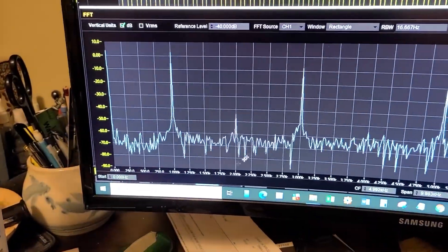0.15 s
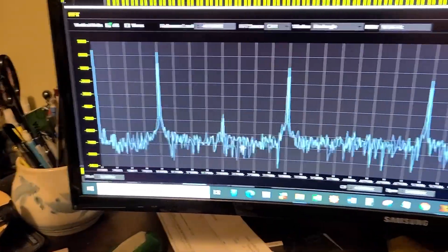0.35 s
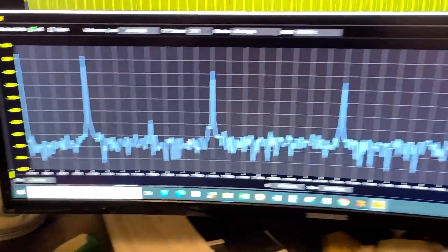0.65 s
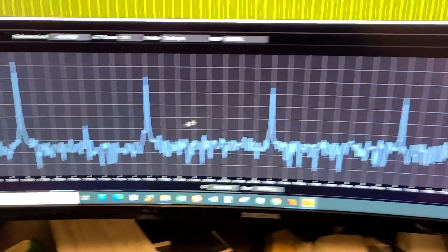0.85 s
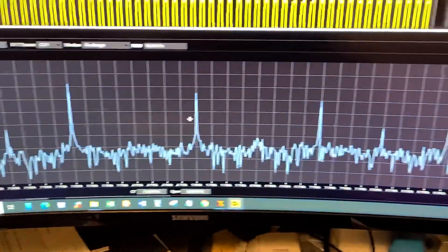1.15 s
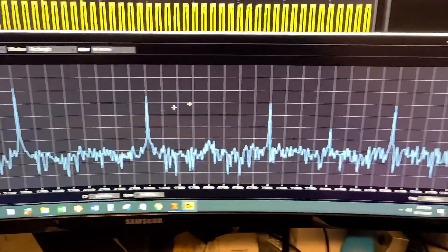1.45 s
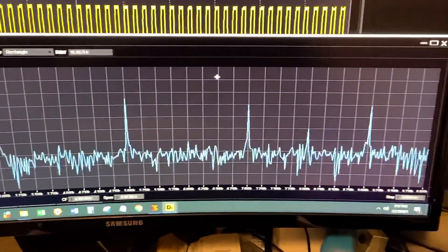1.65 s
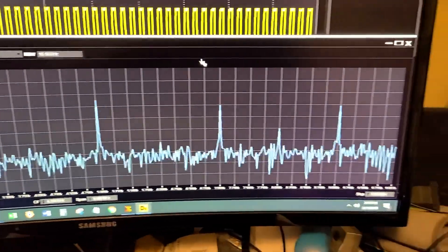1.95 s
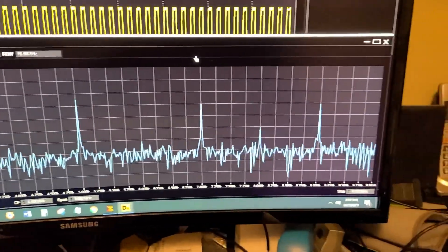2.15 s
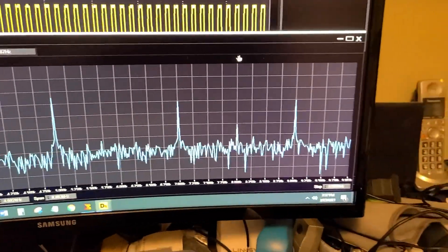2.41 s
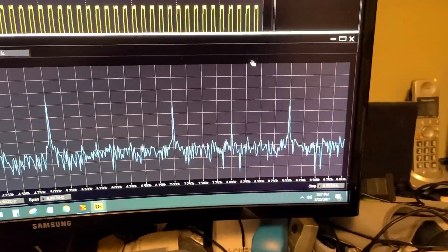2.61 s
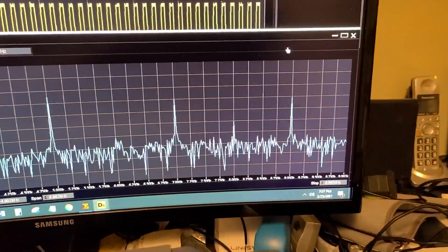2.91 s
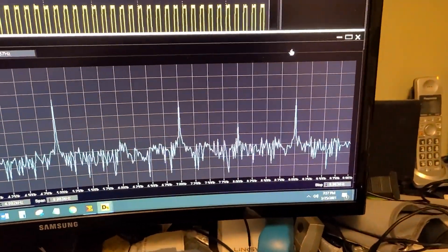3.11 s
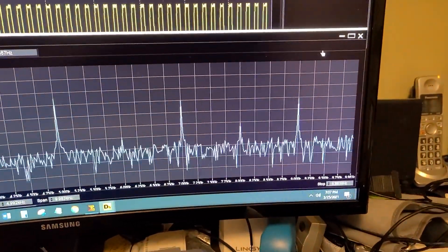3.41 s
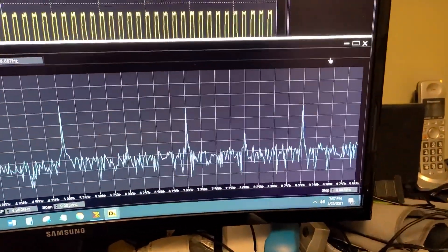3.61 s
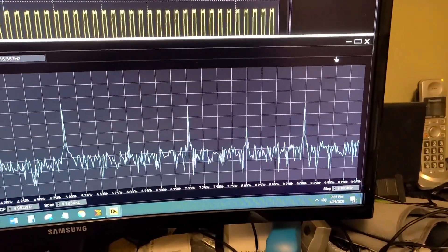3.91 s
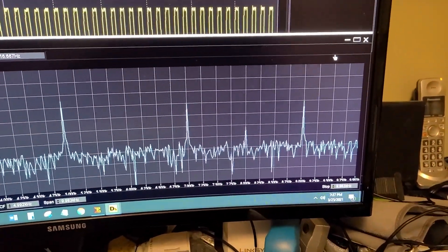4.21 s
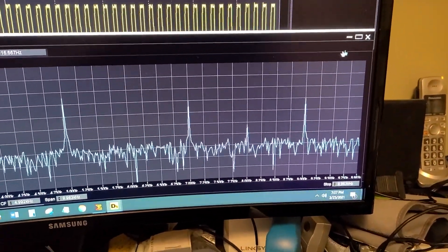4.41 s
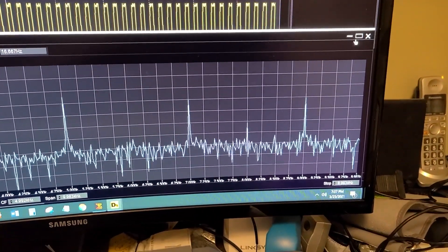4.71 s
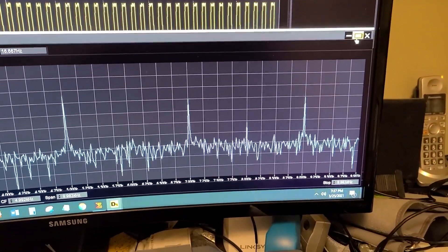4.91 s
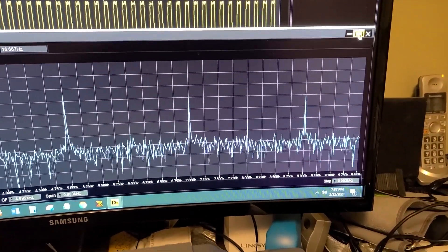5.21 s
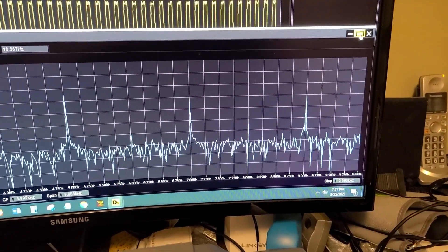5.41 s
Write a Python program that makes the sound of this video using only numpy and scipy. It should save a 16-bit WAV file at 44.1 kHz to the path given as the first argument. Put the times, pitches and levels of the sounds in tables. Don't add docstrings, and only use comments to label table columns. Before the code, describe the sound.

Close phone pickup in a small room: a low, slightly wavering fan tone with soft air rush and hiss underneath. Two faint desk bumps come first, then firmer hollow knocks of a plastic mouse with a tiny loose rattle and a short rubbing slide. A clattering landing and a softer one follow; near the end the button snaps down and up.

```python
import sys
import numpy as np
from scipy import signal
from scipy.fft import rfft, irfft
from scipy.io import wavfile
from scipy.ndimage import uniform_filter1d

SR = 44100
rng = np.random.default_rng(int(sys.argv[2]) if len(sys.argv) > 2 else 0)


def natural_amplitude(level_db):
    exponent = np.asarray(level_db, float) / 20
    return 10 ** exponent


def unload_audio(sound):
    columns = np.transpose(np.atleast_2d(sound))
    steps = np.round(np.clip(columns, -1, 1) * 32767)
    wavfile.write(sys.argv[1], SR, steps.astype(np.int16))


N = 244755
T = np.arange(N) / SR


def read(table, hz):
    f, v = np.transpose(table)
    return np.interp(np.log(hz + 1e-9), np.log(f), v)


def noise(colour, size=N):
    # [f/Hz, likeness 0-1]
    likeness = [(20, 0.7), (60, 0.88), (110, 0.92), (270, 0.94), (430, 0.95), (600, 0.39), (1000, 0),
                (20000, 0)]
    hz = np.fft.rfftfreq(size, 1 / SR)
    like = np.clip(read(likeness, hz), 0, 1)
    mid, side = rfft(rng.standard_normal((2, size))) * natural_amplitude(read(colour, hz))
    mid = mid * np.sqrt(1 + like)
    side = side * np.sqrt(1 - like)
    out = irfft(np.array([mid + side, mid - side]), size)
    return out / np.sqrt(np.mean(out ** 2))


def walk(rate_hz):
    hold = int(SR / rate_hz)
    steps = np.repeat(rng.standard_normal(N // hold + 1), hold)
    v = uniform_filter1d(uniform_filter1d(steps, hold), hold)[:N]
    return v / v.std()


def ring(modes, db, scatter_db, lag_ms=0., unlike=0., rise_ms=.1):
    hz, gain_db, t60_s = np.transpose(modes)[:, :, None]
    pitch_scatter = 0.008
    chance = rng.standard_normal((4, len(modes), 1))
    t = np.arange(SR // 4) / SR
    sense = (-1) ** np.arange(len(modes))[:, None]
    gain = natural_amplitude(gain_db + scatter_db * chance[0]) * sense
    out = []
    for port, lag_s in ((1.0, lag_ms / 1000), (-1.17, 0.000054)):
        late = np.maximum(t - lag_s, 0)
        phase = 2 * np.pi * hz * (1 + pitch_scatter * chance[1]) * late + port * unlike * chance[2]
        rise = (1 - np.exp(-late * 1000 / rise_ms)) ** 2
        decay = np.exp(-np.log(1000) * late / t60_s)
        port_gain = natural_amplitude(port * unlike * 2 * chance[3])
        out.append(np.sum(gain * port_gain * rise * decay * np.sin(phase), axis=0))
    return natural_amplitude(db) * np.array(out) / np.abs(out).max()


def crack(colour, db, t60_s, rise_ms=0.9):
    t = np.arange(SR // 8) / SR
    rise = 1 - np.exp(-t * 1000 / rise_ms)
    burst = noise(colour, size=len(t)) * rise * natural_amplitude(-60 * t / t60_s)
    return natural_amplitude(db) * burst / np.sqrt(np.mean(burst[:, :SR // 200] ** 2))


def add(out, sound, s):
    i = int(s * SR)
    out[:, i:i + sound.shape[1]] += sound[:, :N - i]


def knocks():
    # [t/s, desk force/dB, shell/dB re force, edge/dB re force, hardness/dB re edge]
    landings = [(.332, -48, -23, -40, -2), (0.4838, -47, -1, -16, -5), (1.1066, -42, 1.5, -0.5, -5),
                (1.115, -46.5, -7, -11.5, 8), (1.2330, -31, 2.5, -1, -10.5), (1.2414, -47, -30, 8, -15),
                (2.043, -40.5, 5, 3.5, -3), (2.052, -45, 3, -20, -3), (2.064, -37, 12, -3, -7),
                (2.072, -41, -3, -3, -6.5), (3.0388, -49.5, -4, -3, -17), (3.047, -50.5, -21, -3, -15),
                (3.0974, -35.5, 4.5, -5, -20), (3.1023, -48.5, 7, 4, -9)]
    # [t/s, peak level/dB]
    swings = [
        (1.109, -51),
        (1.233, -40.5),
        (2.064, -44.5),
        (3.101, -56.5),
    ]
    # [f/Hz, level/dB, t60/s]
    desk_modes = [(228.7, -11.5, 0.11), (331, -9, 0.055), (252, -22, 0.023)]
    thud_modes = [(112.7, 0, 0.27)]
    shell_modes = [(472.4, -6, 0.17), (534, 3.5, 0.065), (596, 13.5, 0.023), (726, -9.5, 0.14),
                   (791, 7.5, 0.034), (832, 8.5, 0.021), (967, -29, 0.014)]
    # [f/Hz, level/dB per Hz]
    edge_colour = [(350, -42), (700, 2.5), (1050, 6.5), (1350, 10), (1600, 6.5), (1900, -5), (2300, -13.5),
                   (3500, -36.5)]
    rim_colour = [(900, -48), (1500, -20), (1900, 5.5), (2300, 2), (2600, 4.5), (3100, -6.5), (3500, -46),
                  (5000, -51)]
    treble_colour = [(2000, -45), (3300, -3), (4200, -4.5), (5000, 0), (6000, -9), (7200, -3),
                     (8500, -23.5), (11000, -25), (14000, -31), (16000, -49)]
    lag_ms, edge_t60_s, treble_t60_s = 0.15, 0.041, 0.06
    rim_re_edge_db, treble_re_edge_db = -0.2, -9.5
    out = np.zeros((2, N))
    for s, desk_db, shell_re_db, edge_re_db, hard_db in landings:
        shell_db = desk_db + shell_re_db
        edge_db = desk_db + edge_re_db
        rim_db = edge_db + hard_db + rim_re_edge_db
        treble_db = edge_db + hard_db + treble_re_edge_db
        add(out, ring(desk_modes, desk_db + 4, 1.0, lag_ms, unlike=.05, rise_ms=3.8), s)
        add(out, -ring(shell_modes, shell_db + 3, 1.0, lag_ms, unlike=0.3, rise_ms=0.52), s)
        add(out, crack(edge_colour, edge_db, edge_t60_s), s)
        add(out, crack(rim_colour, rim_db, edge_t60_s) * natural_amplitude([[-1.5], [1.5]]), s)
        add(out, crack(treble_colour, treble_db, treble_t60_s), s)
    for s, db in swings:
        add(out, ring(thud_modes, db, 0., lag_ms, unlike=0., rise_ms=2.2), s)
    return out


def ticks():
    # [t/s, peak level/dB, f/Hz]
    rattles = [
        (1.1078, -43, 4600),
        (1.2346, -29, 4750),
        (2.0443, -35, 4600),
        (2.0443, -41, 2700),
        (3.044, -64, 4900),
        (5.0555, -54, 1950),
    ]
    out = np.zeros((2, N))
    for s, db, hz in rattles:
        modes = [(hz, 0, .0055), (1.11 * hz, -1, .005)]
        add(out, ring(modes, db, 0., 0., unlike=.2, rise_ms=.3), s)
    return out


def slide():
    # [f/Hz, level/dB per Hz]
    body_colour = [(300, -13), (600, -7.5), (900, -11), (1300, -2), (1500, -3), (1700, -3.5), (1900, -1.5),
                   (2400, -8), (3000, -9), (3700, -19.5), (4500, -23), (5800, -39)]
    treble_colour = [(2240, -23), (3800, -2.5), (5930, -5.5), (7280, -5), (8010, -12.5), (9600, -20),
                     (11600, -18), (15000, -23), (16000, -29)]
    start_s, attack_s, hold_s, fade_db_per_s = 1.333, 0.0082, 0.016, 233
    level_db, treble_db = -41.5, -13
    t = np.maximum(T - start_s, 0)
    catch = np.minimum(t / attack_s, 1)
    fade_db = -fade_db_per_s * np.maximum(t - attack_s - hold_s, 0)
    grain_db = 2 * walk(350)
    rub = noise(body_colour) + noise(treble_colour) * natural_amplitude(treble_db) * catch
    return rub * catch * natural_amplitude(level_db + fade_db + grain_db + [[.5], [-.5]])


def switch():
    # [t/s, peak level/dB, left minus right/dB, body/dB re peak, top/dB: a release is duller]
    snaps = [
        (5.0553, -54.5, 2.5, -5.5, -3),
        (5.2891, -32.5, 5.5, -11, 0),
        (5.4448, -32.5, 8, -12, -9),
    ]
    # [ms after the snap, level/dB, share of the lean left]
    bounces = [
        (0, 0, .3),
        (.62, 3, 1.3),
        (1.65, -8, 1.2),
    ]
    # [f/Hz, level/dB, t60/s]
    spring_modes = [(4880, -13, 0.0035), (5530, -6, 0.0045), (6550, -2, 0.0035), (7100, -.5, 0.004),
                    (8250, -13, .0035), (10800, -11, 0.0022), (14700, -11, 0.0025)]
    button_modes = [(655, 2, 0.016), (856, -3.5, 0.023), (1180, 0, 0.011), (1493, -4.5, 0.034),
                    (1940, -9.5, 0.025), (2610, -9, 0.014)]
    # [f/Hz, level/dB per Hz]
    tail_colour = [(1760, -47), (4300, -1), (5840, 6.5), (8170, -13), (9010, -12), (11500, 2), (13000, -22),
                   (14800, -8), (16000, -21)]
    top_from_hz = 7700
    tail_re_body_db, tail_t60_s = -5.5, 0.021

    def dulled(table, top_db):
        return [(hz, v + top_db * (hz > top_from_hz), *rest) for hz, v, *rest in table]

    out = np.zeros((2, N))
    for s, db, pan_db, body_re_db, top_db in snaps:
        lean_db = np.array([[pan_db / 2], [-pan_db / 2]])
        body_db = db + body_re_db
        for ms, bounce_db, share in bounces:
            snap = ring(dulled(spring_modes, top_db), db + bounce_db, .6, 0., unlike=.25, rise_ms=.15)
            add(out, snap * natural_amplitude(share * lean_db), s + ms / 1000)
        add(out, ring(button_modes, body_db, .8, 0., unlike=.4, rise_ms=.3), s)
        rustle = crack(dulled(tail_colour, top_db), body_db + tail_re_body_db, tail_t60_s)
        add(out, rustle * natural_amplitude(lean_db), s)
    return out


def room(x):
    # [f/Hz, t60/s, level/dB]
    bands = [(285, 0.22, -34), (954, 0.18, -27.5), (2660, 0.26, -25.5), (7000, 0.4, -29.5),
             (12000, 0.22, -23)]
    t = np.arange(SR // 3) / SR
    onset = np.minimum(t / 0.0022, 1)
    tail = 0
    for hz, t60_s, db in bands:
        band = noise([(hz / 4, -30), (hz / 1.16, 0), (hz * 1.58, 0), (hz * 4, -30)], size=len(t))
        unit_energy = np.sqrt(2 * np.log(1000) / t60_s / SR)
        tail = tail + band * natural_amplitude(db - 60 * t / t60_s) * unit_energy * onset
    return signal.fftconvolve(x.mean(axis=0, keepdims=True), 4 * tail, axes=1)[:, :N]


def ports(x, share):
    # [f/Hz, left minus right/dB]
    port_lean = [(600, 1), (1000, 4.5), (3000, 4), (4500, 5), (5600, 20), (6800, 75), (7800, 35),
                 (8800, 18), (11000, 1)]
    lean = natural_amplitude(share * read(port_lean, np.fft.rfftfreq(N, 1 / SR)))
    right = np.sqrt(2 / (1 + lean ** 2))
    return irfft(rfft(x) * np.array([right * lean, right]), N)


def fans():
    # [t/s, gain/dB]
    facing = [(0, 4), (.3, 4), (.63, 5), (.93, 1.5), (1.37, 4), (1.67, 0), (2.2, 0), (2.81, -1.5),
              (3.32, 0.25), (4.0, 0), (4.62, -.5), (5.55, 0.75)]
    # [t/s, left minus right/dB]
    direction = [(0, -3.5), (.8, 1), (1.75, 4.5), (2.6, 5.5), (5.55, 4)]
    shaft_orders = {9: (-72.5, 1.2), 11: (-75, -2.0), 12: (-81, .1), 16: (-71.5, -.5), 17: (-90.5, .1),
                    19: (-90.5, .1), 20: (-91, .1), 21: (-88, 3.7), 24: (-83.5, 10.6)}
    # [f/Hz, level/dB per Hz]
    rush_colour = [(82, -69), (140, -20), (260, -8.5), (320, -6), (350, -7), (395, 0.5), (430, 0.5),
                   (470, -5.5), (515, -10.5), (640, -18.5), (700, -23), (800, -17.5), (900, -29.5),
                   (1200, -87.5)]
    whir_colour = [(410, -36), (700, -14), (812, -9), (825, -18), (877, -10.5), (906, -8), (1220, -7.5),
                   (1320, -9), (1400, -7.5), (2600, -26.5), (3380, -59), (5720, -120)]
    rumble_colour = [(8.8, -57), (15, -45), (27, -31), (30, -9), (43, -13.5), (59, -3), (81, -5.5),
                     (103, 2), (123, -4), (140, -14), (180, -48), (310, -120)]
    shaft_hz, blades = 53.55, 7
    mains_hz, mains_db, rumble_db = 60.6, -85, -67.5

    facing_db = np.interp(T, *np.transpose(facing))
    tone_db = -58 + 1.5 * facing_db
    rush_db = -59 + 0.87 * facing_db
    whir_db = -73 + 0.96 * facing_db
    order_gain_db = -0.48 * facing_db

    pan_db = np.interp(T, *np.transpose(direction))
    lean_db = np.array([pan_db, -pan_db]) / 2
    heard_s = T + lean_db * 3.0e-5
    shaft_phase = 2 * np.pi * shaft_hz * heard_s + 0.044 * walk(10)
    blade_phase = blades * shaft_phase + 0.087 * walk(12)
    tones = np.sin(blade_phase) * natural_amplitude(tone_db + 1.7 * walk(12) + lean_db)
    for order, (db, side_db) in shaft_orders.items():
        side = np.array([[side_db / 2], [-side_db / 2]])
        order_tone = np.sin(order * shaft_phase + rng.uniform(0, 2 * np.pi))
        tones = tones + order_tone * natural_amplitude(db + order_gain_db + 0.92 * walk(7.1) + side)
    tones = tones + np.sin(2 * np.pi * mains_hz * T) * natural_amplitude(mains_db + 0.6 * walk(5.4))

    rush = np.array([np.interp(when, T, v) for when, v in zip(heard_s, noise(rush_colour))])
    rush = rush * natural_amplitude(rush_db + 1.3 * walk(8.5) + 0.26 * lean_db)
    whir = ports(noise(whir_colour), 0.89) * natural_amplitude(whir_db + 0.21 * walk(11.0))
    rumble = noise(rumble_colour) * natural_amplitude(rumble_db)
    return np.sqrt(2) * tones + rush + whir + rumble


def port_hiss():
    # [f/Hz, level/dB per Hz]
    hiss_colour = [(1060, -23), (1800, -2.5), (1960, -12.5), (2400, -6), (3050, -2.5), (4090, -11.5),
                   (5110, -14.5), (5710, -13.5), (6800, 3), (8030, -15.5), (8640, -26.5), (10600, -16),
                   (14900, -19.5), (15700, -18), (16300, -28)]
    return ports(noise(hiss_colour), 1) * natural_amplitude(-78.5 + 5.5)


def scene():
    mouse = knocks() + switch() + slide()
    tick = ticks()
    return ports(mouse + tick + room(mouse + 0.3 * tick), 0.38) + fans()


def top_cut(x):
    return signal.sosfilt(signal.butter(12, 16490, fs=SR, output="sos"), x)


def record(dry):
    top_hz = 15700
    low_pass = signal.ellip(6, .2, 40, top_hz, fs=SR, output="sos")
    mix = signal.sosfilt(low_pass, dry + port_hiss())
    return top_cut(mix)


dry = scene()
out = record(dry)
unload_audio(out)
```